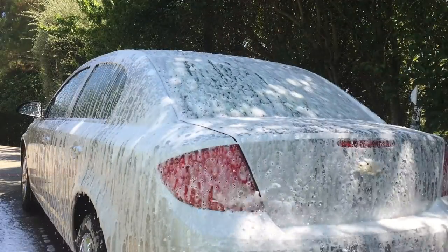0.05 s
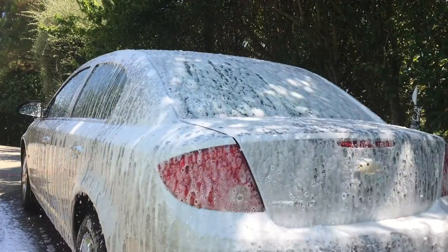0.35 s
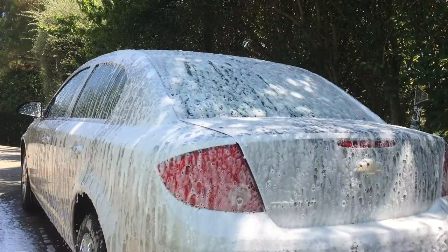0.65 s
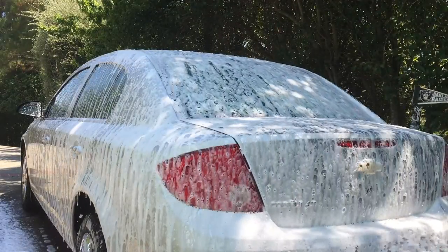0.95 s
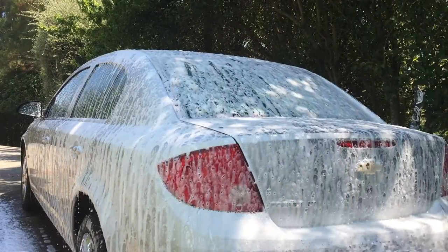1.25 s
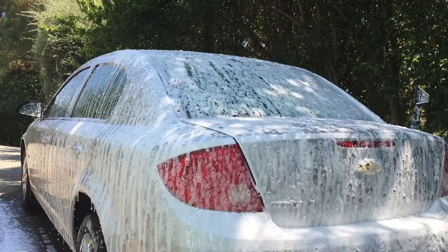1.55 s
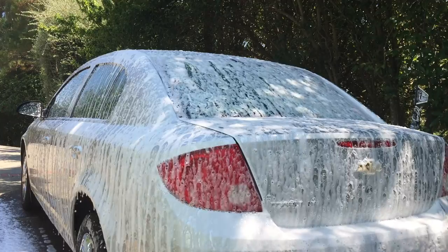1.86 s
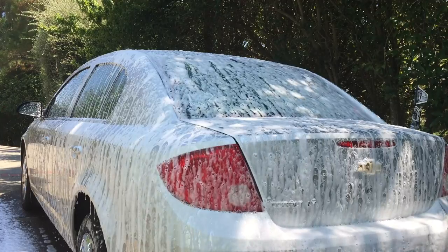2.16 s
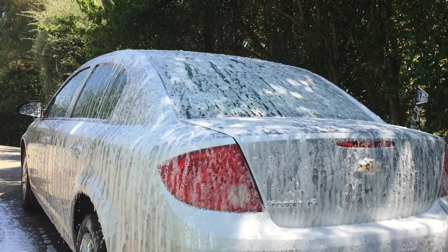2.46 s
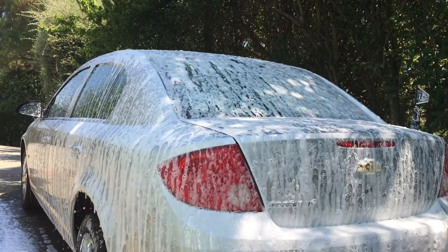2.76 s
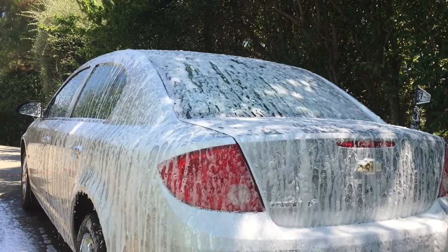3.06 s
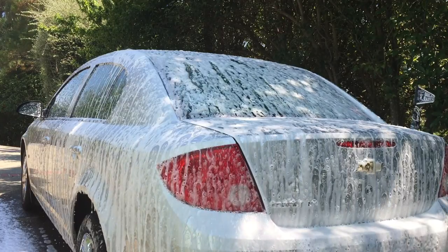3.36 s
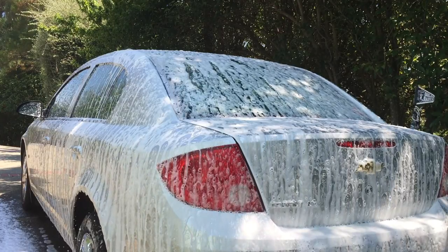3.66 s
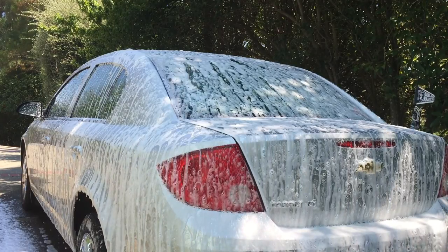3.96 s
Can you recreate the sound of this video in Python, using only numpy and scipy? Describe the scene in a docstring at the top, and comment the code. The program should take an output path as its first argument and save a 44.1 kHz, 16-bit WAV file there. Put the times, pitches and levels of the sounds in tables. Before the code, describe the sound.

A foam sprayer hisses loudly from the start, outdoors. Its jet spatters and drums on a car's near panels until about 0.7 seconds and again from 1.1 to 1.6, then turns to a smoother hiss. At about 2.5 seconds it cuts off with a soft, dull knock. Until 4 seconds, foam quietly fizzes, plops and drips onto wet paving, thinning out over a faint low rumble.

```python
"""A foam sprayer hisses over a car outdoors. Twice its jet sweeps the near panels, spattering and
drumming on them, then it plays on the far side until the trigger shuts with a soft knock.
Foam is left fizzing and dripping onto wet paving over a low outdoor rumble. The hiss and rumble
are shaped noise, each drop is a click, and each bubble is a short ringing tone."""
import sys
import numpy as np
from scipy import signal
from scipy.fft import rfft, irfft, next_fast_len
from scipy.io import wavfile
from scipy.ndimage import uniform_filter1d, map_coordinates

SR = 44100
rng = np.random.default_rng(int(sys.argv[2]) if len(sys.argv) > 2 else 0)


def generate_wav(signal):
    """Clip the signal to [-1, 1] and save it as 16-bit WAV at the path in sys.argv[1]."""
    frames = np.transpose(np.atleast_2d(signal))
    scaled = np.clip(frames, -1, 1) * 32767
    pcm = np.round(scaled).astype(np.int16)
    wavfile.write(sys.argv[1], SR, pcm)


N = 176400
TIME = np.arange(N) / SR
SIZE = next_fast_len(N + SR // 2)
HZ = np.fft.rfftfreq(SIZE, 1 / SR)

def amp(db):
    """Turn decibels into a gain."""
    return 10 ** (np.asarray(db) / 20)

def unit(x):
    """Scale a sound to an average (rms) size of 1."""
    return x / np.sqrt(np.mean(x ** 2) + 1e-20)

def curve(rows):
    """Join (time, value) points with straight lines."""
    return np.interp(TIME, *np.transpose(rows))

def wobble(per_s):
    """A smooth curve through per_s random values a second."""
    return map_coordinates(rng.standard_normal(int(N * per_s / SR) + 4), [TIME * per_s])

def tone(points):
    """A filter that follows (frequency, gain) points."""
    hz, db = np.transpose(points)
    gain = amp(np.interp(np.log(HZ + 1), np.log(hz), db))
    cepstrum = irfft(np.log(gain), SIZE)
    # folded so the filter rings only after a click, never before
    cepstrum[1:SIZE // 2] *= 2
    cepstrum[SIZE // 2 + 1:] = 0
    return np.exp(rfft(cepstrum))

def filtered(x, response):
    """Pass a sound through a filter."""
    return irfft(rfft(x, SIZE) * response, SIZE)[:N]

def noise(response):
    """Filtered noise of size 1."""
    return unit(filtered(rng.standard_normal(N), response))

def resonance(hz, width_hz):
    """A filter that keeps one band of pitches."""
    return (1j * HZ * width_hz / (hz * hz - HZ ** 2 + 1j * HZ * width_hz)) ** 2

def patchy(x, depth_db):
    """Make random patches of time and pitch louder or softer."""
    spectrum = signal.stft(x, nperseg=1024)[2]
    patches = uniform_filter1d(rng.standard_normal(spectrum.shape), size=3, axis=0)
    patches = unit(uniform_filter1d(patches, size=5, axis=1))
    return unit(signal.istft(spectrum * amp(depth_db * patches), nperseg=1024)[1][:N])

def droplets(per_s, spread_db):
    """Random clicks, mostly small with a few large."""
    hits = rng.random(N) < per_s / SR
    size = np.minimum(rng.exponential(size=N), 4.5)
    return hits * amp(spread_db * size) * rng.choice([-1, 1], N)

def bubbles(per_s=1400, middle_hz=4167, fade_cycles=6.7):
    """A swarm of tiny bubbles, each ringing for a few cycles."""
    start, pitch, size = rng.random((int(per_s * N / SR), 3)).T
    hz = middle_hz * 3 ** (2 * pitch[:, None] - 1)
    samples = np.arange(SR // 70)
    cycles = hz * samples / SR
    strength = amp(-3 * np.log(size[:, None] + 0.022)) * np.sqrt(hz)
    waves = strength * np.sin(2 * np.pi * cycles) * np.exp(-cycles / fade_cycles)
    positions = (start * N).astype(int)[:, None] + samples
    return np.bincount(positions.ravel(), waves.ravel(), N)[:N]

def splashes(rows, points, scatter, width, rise_s=0.0012):
    """Each drop snaps at its own pitch, then droplets fly off; more scatter is more ragged."""
    out, n = np.zeros(N + SR), SR // 8
    surface = rfft(irfft(tone(points))[:n])
    age, f = np.arange(n) / SR, np.fft.rfftfreq(n, 1 / SR)
    for s, db, hz, fade_s in rows:
        band = 1j * f * width * hz / (hz * hz - f ** 2 + 1j * f * width * hz)
        response = surface * band
        envelope = np.exp(-age / fade_s) * (1 - np.exp(-age / rise_s))
        drops = scatter * rng.standard_normal(n) * rng.random(n) ** 2 * envelope
        snap_peak = np.abs(irfft(band * response)).max()
        sound = irfft((band + rfft(drops)) * response, n)[:n // 2] / snap_peak
        out[int(s * SR):][:len(sound)] += amp(db) * sound
    return out[:N]

# how loud the hiss is (time [s], level [dB])
JET_LEVEL = [(0, -36), (.12, -36.5), (.6, -37.5), (.8, -36.5), (1.0, -39.5), (1.2, -33), (1.5, -35.5),
             (1.7, -36.5), (2.1, -37), (2.35, -36), (2.52, -36.5)]
# its tone (frequency [Hz], gain [dB])
JET_TONE = [(25, -47), (60, -18), (140, -10), (300, -15), (380, -9), (520, -13), (640, 0.5), (780, -7.5),
            (870, -0.5), (960, -5), (1100, -2), (1600, -3.5), (2000, 0.5), (2500, 0), (3300, -4),
            (4200, -2), (4900, -5.5), (5800, -7), (7500, -9.5), (9300, -10.5), (11200, -15.5), (12700, -12),
            (14000, -17), (15500, -21)]
def jet():
    """Foam rushes from the sprayer with a smooth hiss."""
    return amp(curve(JET_LEVEL) + .6 * wobble(110)) * patchy(noise(tone(JET_TONE)), depth_db=2.06)

# how hard the jet hits the near panels (time [s], level [dB])
STRIKE_LEVEL = [(0, -32.5), (.08, -29.5), (.11, -26), (.22, -27.5), (.45, -28), (.62, -30), (.76, -38),
                (.88, -41.5), (1.08, -34), (1.18, -31), (1.3, -29.5), (1.46, -29.5), (1.6, -36),
                (1.72, -51), (2.1, -54), (2.35, -45), (2.52, -46)]
# the bright tone of those hits (frequency [Hz], gain [dB])
PANEL_TONE = [(30, -24), (200, -18), (600, -5), (1500, -7.5), (3000, -5), (4900, -2), (5600, 0),
              (6600, -0.5), (7800, -2.5), (9500, -1), (12000, -1.5), (15500, -3)]
def strike(flutter):
    """The jet breaks on the panels into droplets, bursting bubbles and mist."""
    bright = tone(PANEL_TONE)
    spatter = amp(-3.5) * unit(filtered(droplets(per_s=3500, spread_db=2.8), bright))
    froth = amp(-8.5) * unit(filtered(bubbles(), bright))
    mist = amp(-5) * patchy(noise(bright), depth_db=3.5)
    return amp(curve(STRIKE_LEVEL) + .8 * flutter + 1.3 * wobble(250)) * (spatter + froth + mist)

# how loud the sliding foam is (time [s], level [dB])
WASH_LEVEL = [(0, -37.5), (.15, -39.5), (.45, -42.5), (.6, -36.5), (.8, -37.5), (1.0, -34.5), (1.14, -33),
              (1.35, -39.5), (1.58, -39), (1.75, -49.5), (2.52, -52)]
# its tone (frequency [Hz], gain [dB])
WASH_TONE = [(30, -44), (500, -29.5), (1600, -6.5), (1950, 0), (2400, -14.5), (3000, -4.5), (3700, 0),
             (4800, -8.5), (5700, -1.5), (7000, -8.5), (8500, -12.5), (15000, -38)]
def wash():
    """Foam slides softly over the panels."""
    return amp(curve(WASH_LEVEL) + .8 * wobble(71.1)) * patchy(noise(tone(WASH_TONE)), depth_db=2.5)

# how loud the drumming is (time [s], level [dB])
DRUM_LEVEL = [(0, -50), (.18, -41), (.45, -46.5), (.6, -48), (.88, -57), (1.03, -47), (1.2, -44.5),
              (1.47, -41.5), (1.62, -55), (1.8, -61), (2.5, -69)]
# its deep tone (frequency [Hz], gain [dB])
DRUM_TONE = [(25, -34), (50, -16), (100, -10.5), (150, -0.5), (185, -4.5), (235, -9), (320, -10),
             (420, -10.5), (900, -14.5), (2500, -69)]
def drum(flutter):
    """The panels drum under the jet."""
    return amp(curve(DRUM_LEVEL) + 2 * flutter) * noise(tone(DRUM_TONE))

# foam running off the car (time [s], level [dB])
RUNOFF_LEVEL = [(0, -49), (2.65, -48), (2.8, -47), (2.87, -49), (3.03, -52.5), (3.1, -48.5), (3.16, -52.5),
                (3.22, -50), (3.28, -53), (3.36, -51.5), (3.46, -57.5), (3.58, -55.5), (3.71, -56.5),
                (4, -58)]
# the tone of wet paving being hit (frequency [Hz], gain [dB])
PAVING_TONE = [(200, -47), (800, -19), (1300, -12), (2000, -2), (2800, -1), (4800, -4), (6000, -2.5),
               (7500, -10.5), (11000, -10), (15500, -12.5)]
def runoff():
    """Foam patters down and fizzes, hidden at first by the louder spray."""
    wet = tone(PAVING_TONE)
    clumps = droplets(per_s=450, spread_db=2.6) * amp(2.2 * wobble(90))
    patter = amp(-4) * unit(filtered(clumps, wet))
    fizz = amp(-7) * patchy(noise(wet), depth_db=-2.5)
    froth = amp(-11) * unit(filtered(bubbles(), wet))
    return amp(curve(RUNOFF_LEVEL)) * (patter + fizz + froth)

# how loud the settling mist is (time [s], level [dB])
MIST_LEVEL = [(2.5, -48.5), (2.8, -55), (3.2, -51.5), (3.3, -61.5), (3.45, -64.5), (4, -58.5)]
# its tone (frequency [Hz], gain [dB])
MIST_TONE = [(30, -40), (300, -27), (1500, -12.5), (5000, -2), (9000, -5.5), (15500, -13.5)]
def settling_mist():
    """Fine mist lands in uneven clumps, noticed once the jet stops."""
    clumps = droplets(per_s=2500, spread_db=2.5) * amp(1.8 * wobble(80))
    return amp(curve(MIST_LEVEL)) * patchy(filtered(clumps, tone(MIST_TONE)), depth_db=3.5)

# how loud the rumble and drone are (time [s], level [dB])
RUMBLE_LEVEL = [(0, -68), (2.45, -68), (2.62, -63.5), (2.85, -72), (3.04, -62.5), (3.18, -71), (3.33, -73),
                (3.37, -64.5), (3.56, -66), (3.64, -62), (3.78, -68), (3.89, -62), (4, -67)]
DRONE_LEVEL = [(2.9, -63.5), (3.08, -66), (3.35, -72.5)]
# the tones of the rumble and the air (frequency [Hz], gain [dB])
RUMBLE_TONE = [(20, -39), (45, -1.5), (85, -0.5), (130, -7), (200, -23), (500, -34), (1500, -46)]
AIR_TONE = [(25, 2), (100, 4), (500, -2), (2000, -6), (8000, -14.5), (15500, -21)]
def outdoors():
    """A deep rumble in swells, a low drone that fades, and faint air."""
    rumble = amp(curve(RUMBLE_LEVEL) + 0.83 * wobble(12)) * noise(tone(RUMBLE_TONE))
    drone = amp(curve(DRONE_LEVEL) + 3.7 * wobble(16)) * noise(resonance(hz=134, width_hz=105))
    return rumble + drone + amp(-68.5) * noise(tone(AIR_TONE))

# drops on the panels (time [s], peak [dB], pitch [Hz], splash fade [s])
FAT_DROPS = [(.026, -13.5, 4500, 0.0023), (.0955, -16, 4000, 0.0046), (.2152, -9.5, 4800, 0.0008),
             (.251, -13, 5000, .002), (.36, -11.5, 5400, .002), (.448, -14, 6000, 0.0011),
             (.604, -15.5, 3000, 0.0048), (1.014, -15, 6000, .001), (1.1318, -15.5, 2200, 0.0027),
             (1.1334, -15, 2300, 0.0014), (1.1905, -9, 7000, 0.0018), (1.2148, -11, 6000, 0.0027),
             (1.236, -16, 11000, .001), (1.255, -11, 6000, .001), (1.2594, -9, 3460, 0.0024),
             (1.2598, -15, 6330, 0.0025), (1.3195, -12, 6000, .002), (1.3217, -6.5, 10000, 0.00092),
             (1.392, -4, 9000, .0015), (1.425, -10, 5500, .001), (1.476, -20, 4500, 0.0022),
             (1.4975, -11.5, 5500, .002)]
def spits():
    """Fat drops crack against the panels."""
    return splashes(FAT_DROPS, PANEL_TONE, scatter=.36, width=1.08)

# brief swells of the spray (time [s], swell time [s], level [dB], pitch [Hz], rough width [Hz])
SPRAY_SWELLS = [(0.133, 0.027, -34.5, 4600, 1800), (.232, 0.018, -34, 5200, 1300),
                (0.297, 0.056, -39, 478, 100), (.33, 0.033, -46, 323, 30), (0.426, 0.045, -44.5, 460, 90),
                (0.657, 0.045, -39, 1010, 800), (1.2, 0.046, -38, 1050, 650),
                (1.427, 0.17, -43.5, 900, 503)]
def swells(flutter):
    """Bright hissing surges as the spray opens, then lower hollow tones from the car's body."""
    out = np.zeros(N)
    for s, swell_s, db, hz, width in SPRAY_SWELLS:
        swell = np.exp(-((TIME - s) / swell_s) ** 2 / 2)
        out += amp(db) * swell * noise(resonance(hz, 1.36 * width))
    return out * amp(1.1 * flutter)

def ring(s, hz, fade_s):
    """A tone that starts softly at time s and falls 60 dB in fade_s."""
    age = np.maximum(TIME - s, 0)
    return np.sin(2 * np.pi * hz * age) * amp(-60 * age / fade_s) * (1 - np.exp(-age * hz))

SHUT_S, SHUT_DB_PER_S = 2.548, 430  # when the trigger shuts, and how fast the spray dies
def valve(hz=397, fade_s=0.058, lag_s=.008):
    """The sprayer gives one dull knock as its trigger shuts."""
    s = SHUT_S + lag_s
    puff = (TIME > s) * amp(-60 * np.abs(TIME - s) / fade_s) * noise(resonance(hz, hz))
    return amp(-35) * (ring(s, hz, fade_s) + amp(-12) * puff)

# blobs of foam landing (time [s], peak [dB], pitch [Hz], splash fade [s])
FOAM_BLOBS = [(2.6456, -29, 2900, 0.0017), (2.6672, -29.5, 5000, 0.004), (2.696, -36, 7500, .004),
              (2.904, -36, 2180, .002), (2.935, -38, 3200, .005), (3.087, -36, 2780, .003),
              (3.0962, -32.5, 4220, 0.0051), (3.1008, -32, 5200, .007), (3.127, -32, 5600, .004),
              (3.1528, -26.5, 7500, 0.0011), (3.1816, -32.5, 2880, 0.0024), (3.201, -37, 3200, .005),
              (3.2143, -32, 2160, 0.0024), (3.312, -39, 2900, .004), (3.335, -39, 2400, .004),
              (3.3565, -38, 2500, .001), (3.3599, -35.5, 2660, 0.006), (3.409, -42, 2700, .003),
              (3.496, -43, 2800, .004), (3.518, -42, 2500, 0.008), (3.538, -39, 4000, .002),
              (3.547, -36, 8500, .001), (3.551, -40, 4500, .002), (3.5815, -37, 2800, .005),
              (3.601, -39, 2700, 0.0064), (3.6428, -37.5, 3200, 0.008), (3.674, -39, 3200, 0.0026),
              (3.739, -44, 2100, .004), (3.787, -39, 3700, 0.0027), (3.818, -44.5, 2800, .01),
              (3.8697, -35.5, 5300, 0.0051), (3.9767, -38, 2820, 0.0046)]
# bubbles ringing in them (time [s], level [dB], pitch [Hz])
TRAPPED_BUBBLES = [(3.182, -43, 2280), (3.36, -48, 2780), (3.739, -44.5, 2000), (3.581, -47, 2400),
                   (3.816, -47, 1940), (3.977, -49, 2550)]
def drips():
    """Larger blobs slap the paving; some trap a ringing bubble."""
    slaps = splashes(FOAM_BLOBS, PAVING_TONE, scatter=.22, width=1)
    return slaps + sum(amp(db) * ring(s, hz, fade_s=0.021) for s, db, hz in TRAPPED_BUBBLES)

# falling lumps (time [s], level [dB], pitch [Hz], rough width [Hz], time to fall 60 dB [s])
SOFT_LUMPS = [(2.758, -54, 855, 1100, 0.23), (2.9, -58, 1100, 700, 0.17), (3.09, -62, 400, 300, 0.1)]
def plops():
    """Soft lumps of foam plop down, each a short dull burst."""
    out = np.zeros(N)
    for s, db, hz, width, fade_s in SOFT_LUMPS:
        age = np.maximum(TIME - s, 0)
        envelope = amp(db - 60 * age / fade_s) * (1 - np.exp(-age / 0.0022))
        out += envelope * noise(resonance(hz, 1.3 * width))
    return out

def echo(x, fade_s=0.077):
    """Sound bounces briefly off the ground, car and trees."""
    t = TIME[:SR // 3]
    tail = rng.standard_normal(len(t)) * amp(-60 * t / fade_s) * (t > .003)
    return signal.fftconvolve(x, tail / np.linalg.norm(tail))[:N]

def scene():
    """All sounds at one microphone, the same in both channels."""
    flutter = wobble(45.48)  # the strike, drumming and swells waver together
    spray = jet() + strike(flutter) + wash() + drum(flutter) + swells(flutter)
    spray *= amp(-SHUT_DB_PER_S * np.maximum(TIME - SHUT_S, 0))
    hits = runoff() + settling_mist() + spits() + valve() + drips()
    mono = spray + outdoors() + hits + amp(-12.5) * echo(hits) + plops()
    return np.array([mono, mono])

# pitches the microphone picks up weakly (frequency [Hz], width [Hz], gain [dB])
MIC_DIPS = [(4930, 120, -3), (7800, 370, -1), (10460, 430, -4.5)]
def record(dry):
    """The microphone softens three high bands and loses the very top."""
    top_hz = 15850
    dips_db = sum(db * np.exp(-((HZ - hz) / width) ** 2) for hz, width, db in MIC_DIPS)
    return np.array([filtered(x, amp(dips_db) * (HZ < top_hz)) for x in dry])

dry = scene()
out = record(dry)
generate_wav(out)
```